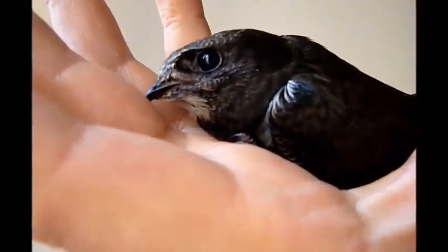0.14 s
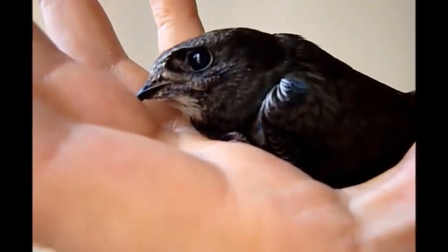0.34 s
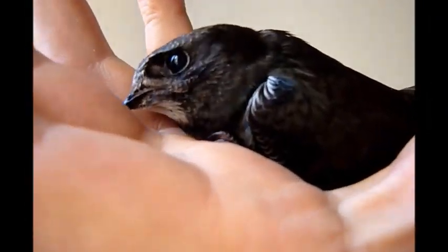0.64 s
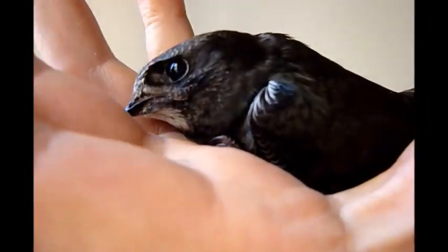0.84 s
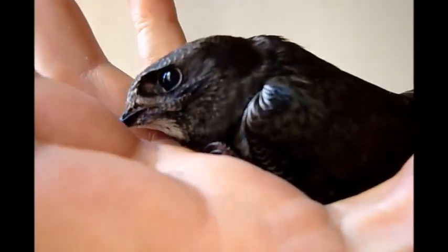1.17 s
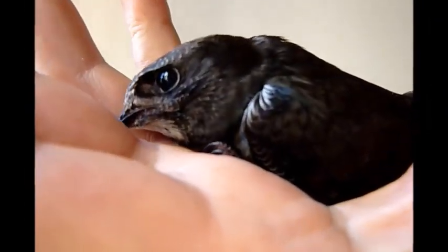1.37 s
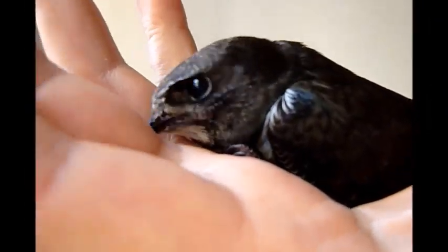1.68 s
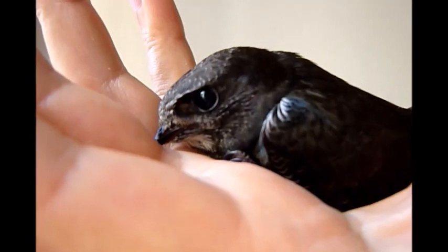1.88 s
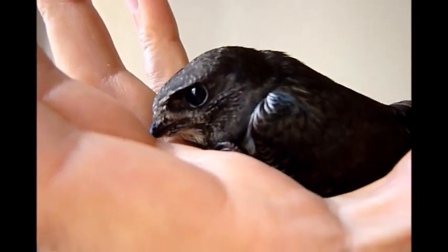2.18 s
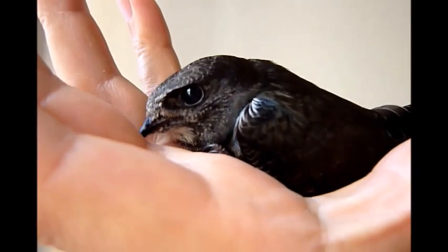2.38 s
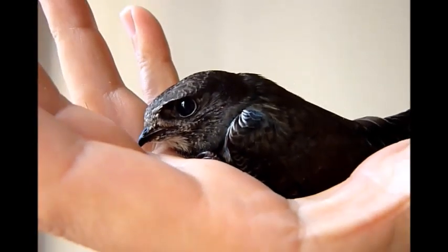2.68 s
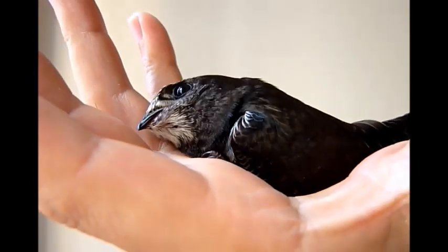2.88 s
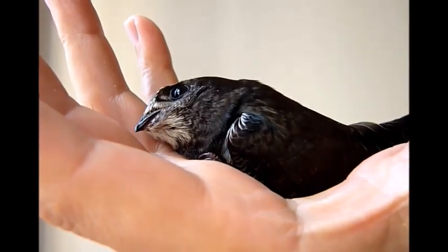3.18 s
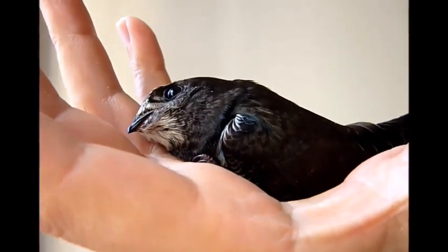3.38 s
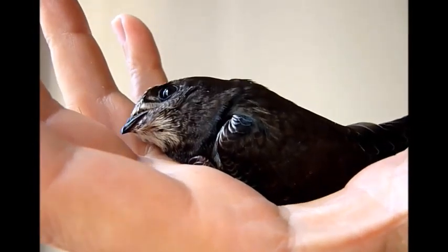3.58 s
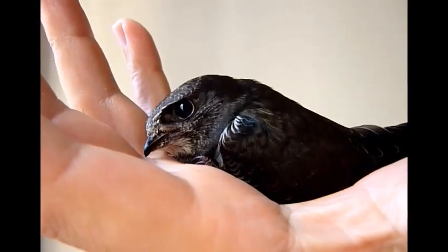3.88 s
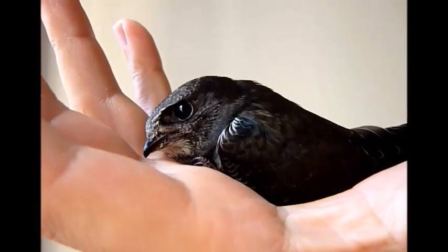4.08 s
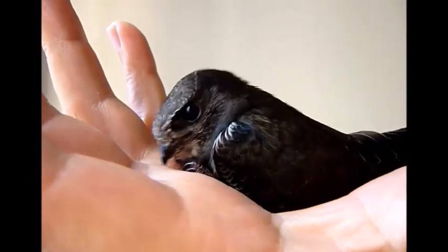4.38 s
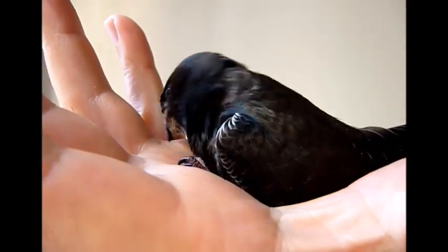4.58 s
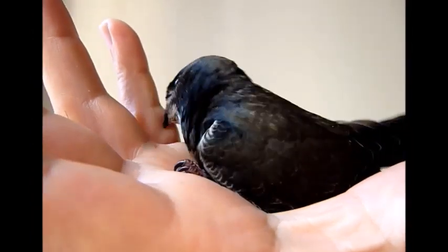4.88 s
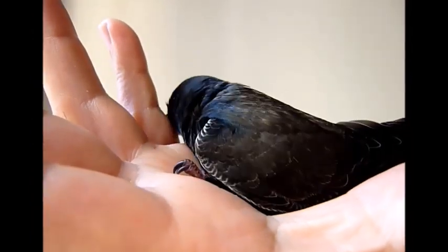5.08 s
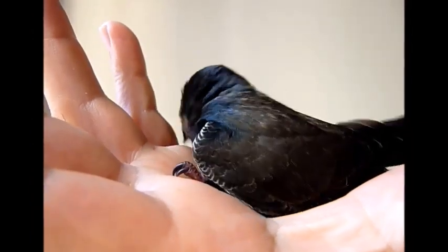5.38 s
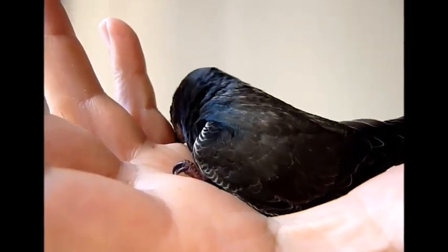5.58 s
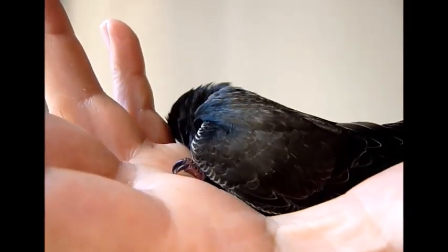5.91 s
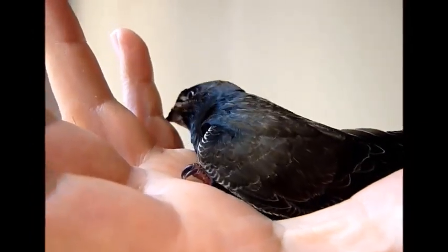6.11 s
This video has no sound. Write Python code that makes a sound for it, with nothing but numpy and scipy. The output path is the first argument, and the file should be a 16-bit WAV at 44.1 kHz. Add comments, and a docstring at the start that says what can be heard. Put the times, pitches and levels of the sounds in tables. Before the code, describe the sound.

Close to the microphone in a small room, a young bird begs in rapid runs of thin, almost pure whistled chirps, about twenty a second, slurred into a quivering trill. Each run tends to climb in pitch, stops abruptly, and resumes after a brief gap. Tiny beak ticks are barely audible. Near the end the bird turns away and sounds softer and roomier. A faint ventilation hum and dull rush continue underneath.

```python
"""A small room, the microphone close by: a young swift held in a hand begs in runs of thin whistled chirps.
About twenty come a second, each an arch of pitch sung by a gliding sine; close ones are slurred together.
Faint beak ticks are puffs of noise. Near the end the bird turns its head away, so that mostly the room,
a dying tail of reflections, answers. A faint ventilation hum and the rush of air, shaped noise, lie underneath."""
import sys
import numpy as np
from scipy import signal
from scipy.fft import rfft, irfft
from scipy.io import wavfile
from scipy.ndimage import uniform_filter1d

SR = 44100
rng = np.random.default_rng(int(sys.argv[2]) if len(sys.argv) > 2 else 0)


def put_to_file(sound):
    """Save the sound as 16-bit audio at rate SR, in the file named by the first command-line argument."""
    columns = np.atleast_2d(sound).T  # one column per channel
    safe = np.clip(columns, -1, 1)
    whole_steps = np.round(safe * 32767)
    wavfile.write(sys.argv[1], SR, whole_steps.astype(np.int16))


N = 275625  # samples, 6.25 s


def swift(jitter=.003, shimmer_db=1.45, octave_at_corner_db=-36, attack_s=0.0015, octave_corner_hz=3700):
    """An almost pure whistle with a slight tremble; only its low notes carry a weak octave."""
    pitch_hz, loudness = gestures()
    pitch_hz = smooth(pitch_hz, 0.00042) * (1 + jitter * drift(250))
    phase = 2 * np.pi * np.cumsum(pitch_hz) / SR
    loudness = smooth(loudness, attack_s) * from_db(shimmer_db * drift(180))
    # the octave is twice as strong well below the corner and vanishes steeply above it
    octave = from_db(octave_at_corner_db) * 2 / (1 + (pitch_hz / octave_corner_hz) ** 8)
    whistle = np.sin(phase) + octave * np.sin(2 * phase)
    return np.sqrt(2) * loudness * whistle  # a steady sine would have rms equal to loudness


# chirps of the bird, levels before tremble and head turn: (start_s, rise_s to the crest, pitch_hz, level_db)
CHIRP_CRESTS = [(0.001, 0.01, 4610, -34.5), (0.051, 0.0051, 4630, -34), (0.107, 0.0087, 4680, -37),
                (0.301, 0.0019, 4200, -40), (0.372, 0.0024, 3166, -55), (0.385, 0.026, 3640, -40.0),
                (0.431, 0.022, 3430, -40.5), (0.467, 0.017, 3550, -39), (0.506, 0.021, 3990, -39.5),
                (0.546, 0.02, 4610, -38.0), (0.609, 0.01, 4764, -36.5), (0.653, 0.016, 4810, -37.5),
                (0.699, 0.018, 4820, -39), (0.738, 0.021, 5266, -34.5), (0.911, 0.0021, 4590, -36),
                (0.94, 0.019, 4196, -38.0), (0.984, 0.02, 4280, -38.0), (1.024, 0.023, 4730, -37),
                (1.078, 0.018, 4840, -35.5), (1.117, 0.028, 5000, -38), (1.166, 0.018, 4620, -39.5),
                (1.203, 0.018, 4800, -37), (1.239, 0.018, 5085, -39.5), (1.276, 0.018, 4940, -35),
                (1.315, 0.02, 5080, -36.5), (1.359, 0.022, 5635, -30.5), (1.571, 0.0021, 3610, -61),
                (1.587, 0.024, 4280, -38), (1.633, 0.017, 3813, -40), (1.667, 0.022, 4500, -38),
                (1.709, 0.025, 4730, -35.5), (1.753, 0.025, 4990, -35.5), (1.8, 0.017, 4770, -38.5),
                (1.826, 0.02, 5230, -37.5), (1.867, 0.018, 5430, -31), (1.909, 0.024, 5930, -30),
                (2.076, 0.002, 4390, -55), (2.153, 0.02, 4340, -39), (2.199, 0.023, 4020, -39.5),
                (2.247, 0.021, 4480, -38), (2.302, 0.011, 4600, -38.5), (2.349, 0.0094, 4985, -33),
                (2.391, 0.015, 5130, -35.0), (2.443, 0.013, 5490, -33.5), (2.494, 0.01, 5490, -34.5),
                (2.711, 0.0017, 3935, -41), (2.74, 0.022, 4284, -38.5), (2.788, 0.02, 4250, -39.5),
                (2.838, 0.017, 4870, -36.5), (2.884, 0.013, 4390, -41), (2.916, 0.021, 4420, -39),
                (2.972, 0.013, 4830, -36.0), (3.022, 0.0071, 5003, -32.5), (3.264, 0.002, 4520, -37.5),
                (3.324, 0.0016, 3760, -41), (3.365, 0.0098, 3820, -41), (3.402, 0.021, 3840, -40.5),
                (3.446, 0.021, 4130, -38.0), (3.509, 0.0015, 3930, -40), (3.547, 0.005, 4060, -38.5),
                (3.594, 0.0055, 4130, -38), (3.631, 0.011, 4060, -40), (3.691, 0.0062, 4420, -39),
                (3.742, 0.0055, 4250, -38.0), (3.903, 0.0013, 4320, -42), (3.923, 0.023, 3700, -45.5),
                (3.96, 0.026, 4080, -39), (4.006, 0.026, 4355, -39.0), (4.061, 0.013, 4400, -40),
                (4.095, 0.02, 4585, -38.5), (4.14, 0.019, 4750, -36.5), (4.195, 0.014, 4790, -37.5),
                (4.238, 0.013, 4590, -40), (4.288, 0.0067, 4650, -39.5), (4.333, 0.0088, 4830, -37.0),
                (4.387, 0.0089, 5026, -34.5), (4.537, 0.0018, 4160, -39), (4.553, 0.021, 3984, -34.0),
                (4.588, 0.0096, 3754, -36.5), (4.615, 0.016, 4170, -35.5), (4.653, 0.014, 4630, -38),
                (4.687, 0.015, 4700, -37.5), (4.718, 0.02, 4360, -39), (4.761, 0.017, 4776, -36.5),
                (4.801, 0.021, 4560, -37.5), (4.839, 0.012, 4736, -36.0), (4.883, 0.017, 5080, -35.0),
                (4.912, 0.007, 4345, -39.5), (4.962, 0.007, 5200, -36.0), (5.137, 0.002, 4460, -43),
                (5.157, 0.018, 4745, -36.5), (5.198, 0.018, 4880, -31.5), (5.247, 0.015, 4974, -32),
                (5.293, 0.016, 5000, -36.0), (5.334, 0.011, 5250, -31.5), (5.378, 0.014, 5220, -35.5),
                (5.422, 0.0066, 5550, -33), (5.604, 0.0034, 4280, -38), (5.632, 0.017, 4350, -35),
                (5.668, 0.019, 4067, -34.5), (5.705, 0.023, 4596, -33.5), (5.749, 0.019, 5010, -33),
                (5.788, 0.016, 4930, -34.0), (5.835, 0.013, 5100, -32.5), (5.877, 0.015, 5200, -30.5),
                (5.927, 0.012, 5670, -35.0), (6.113, 0.0021, 4320, -38.5), (6.136, 0.018, 4610, -36.5),
                (6.174, 0.019, 5005, -36.5), (6.216, 0.019, 4780, -40)]
# shape of a crest; a chirp with hardly any rise is already falling as it starts: (rise_s, roundness exponent)
CREST_ROUNDNESS = [(.002, 1.06), (.012, 1.22)]
# moments when a run of chirps, long or short, stops: (end_s)
RUN_STOPS = [.317, 0.785, 1.407, 1.955, 2.09, 2.528, 3.057, 3.76, 4.406, 4.868, 4.937, 4.981, 5.453, 5.959]
# a chirp that starts this soon after the last crest is slurred onto it
SLUR_WITHIN_S = .029
# a fresh chirp sweeps up to its crest and swells on the way
SWEEP_HZ_PER_S, SWELL_DB_PER_S = 33100, 422
# a free ending slides to a share of the crest pitch, at least down to the relaxed pitch, and fades;
# the fall lasts FALL_S unless the run stops before the next chirp
FALL_S, FALL_SHARE, RELAXED_HZ, FALL_DB = .0238, .828, 3970, 20


def gestures(fade_power=3.22, slurred_turn=0.96, free_turn=.79):
    """Pitch and loudness of the syrinx: a chirp grows out of the last one's trough or starts afresh."""
    t, rows = np.arange(N) / SR, np.array(CHIRP_CRESTS)
    pitch_hz, loudness = np.zeros(N), np.zeros(N)
    next_start = np.append(rows[1:, 0], np.inf)
    slurs_on = next_start - rows[:, 0] - rows[:, 1] < SLUR_WITHIN_S
    for k, (start, rise, crest_hz, crest_db) in enumerate(CHIRP_CRESTS):
        crest = start + rise
        roundness = np.interp(rise, *np.transpose(CREST_ROUNDNESS))
        if k and slurs_on[k - 1]:
            head = *trough(k - 1), slurred_turn
        else:
            head = start, crest_hz - SWEEP_HZ_PER_S * rise, crest_db - SWELL_DB_PER_S * rise, free_turn
        if slurs_on[k]:
            tail = *trough(k), slurred_turn
        else:
            end = next((s for s in RUN_STOPS if crest < s < next_start[k]), crest + FALL_S)
            tail = end, min(FALL_SHARE * crest_hz, RELAXED_HZ), crest_db - FALL_DB, free_turn
        for foot, foot_hz, foot_db, turn in (head, tail):
            span = slice(*np.searchsorted(t, sorted([crest, foot])))
            u = (t[span] - crest) / (foot - crest)  # 0 at the crest, 1 at the foot
            pitch_hz[span] = crest_hz + (foot_hz - crest_hz) * arch(u, turn, roundness)
            loudness[span] = from_db(crest_db + (foot_db - crest_db) * np.abs(u) ** fade_power)
    voiced = pitch_hz > 0
    return np.interp(t, t[voiced], pitch_hz[voiced]), loudness  # pitch glides across the silences


# at times the warble swings wider: (time_s, extra_depth_hz of the troughs)
WARBLE_DEPTH = [(.8, 0), (.94, 302), (1.02, 0), (1.86, 0), (1.91, 281), (2.22, 130), (2.7, -1), (4.9, -1.5),
                (5.2, 476), (5.42, 344), (5.62, -1), (5.71, 75.5), (5.79, 703), (5.9, 498), (6.1, 102.5)]
# slurred crests further apart than SAG_AFTER_S have a lower trough, the lower the longer the wait
SAG_AFTER_S, SAG_HZ_PER_S = .0325, 53500
# the voice thins by THIN_DB in a trough THIN_AT_HZ deep, and hardly at all in a shallow one
THIN_DB, THIN_AT_HZ, THIN_POWER = 12, 835, 1.54


def trough(k):
    """The low point between chirp k and the one slurred onto it, quieter the deeper: (s, Hz, dB)."""
    (start, rise, hz, db), (next_start, next_rise, next_hz, next_db) = CHIRP_CRESTS[k:k + 2]
    wait = next_start + next_rise - start - rise
    sag_hz = SAG_HZ_PER_S * max(wait - SAG_AFTER_S, 0)
    sag_hz += np.interp(next_start, *np.transpose(WARBLE_DEPTH))
    thinning_db = THIN_DB * (max(sag_hz, 0) / THIN_AT_HZ) ** THIN_POWER
    return next_start, min(hz, next_hz) - sag_hz, (db + next_db) / 2 - thinning_db


def arch(u, turn, roundness):
    """Share of the drop from crest (u = 0) to foot (u = 1); a turn near 1 levels out into a trough."""
    return (1 - np.cos(np.pi * turn * np.abs(u) ** roundness)) / (1 - np.cos(np.pi * turn))


# faint ticks of the beak, before the head turn: (start_s, level_db of the rough peak, twice the rms)
BEAK_TICKS = [(.326, -60.5), (.558, -55), (.571, -53), (.613, -54.5), (.6725, -55), (1.037, -53.5),
              (1.229, -49), (1.686, -51), (3.665, -55), (4.03, -55), (4.158, -48.5), (4.891, -44.5),
              (4.958, -55)]
TICK_HZ, TICK_WIDTH_HZ, TICK_T60_S = 5500, 2800, 0.038


def beak():
    """Each tick is a puff of bright noise that dies away by 60 dB in some hundredths of a second."""
    t = np.arange(N) / SR
    level = np.zeros(N)
    for start, peak_db in BEAK_TICKS:
        after = t >= start
        level[after] += from_db(peak_db - 60 * (t[after] - start) / TICK_T60_S)
    return level * resonance(TICK_HZ, TICK_WIDTH_HZ) / 2  # halved: from peak to rms


# close echoes off the palm and fingers: (delay_s, gain)
PALM_ECHOES = [(.0007, 0.063), (.0023, 0.022)]


def hand(x):
    """Close echoes ripple the level as the pitch sweeps."""
    t = np.arange(N) / SR
    return x + sum(gain * np.interp(t - delay, t, x, left=0) for delay, gain in PALM_ECHOES)


# the head shadows the direct path when the beak points away: (time_s, level_db of the direct sound)
HEAD_TURN = [(0, 0), (5.0, 0), (5.141, -15.5), (5.45, -12), (5.58, -4.5), (5.72, -6), (5.77, -15),
             (5.97, -11), (6.1, -5), (6.25, 1.5)]


def facing(x):
    """The direct sound weakens as the beak turns away from the microphone."""
    return x * from_db(np.interp(np.arange(N) / SR, *np.transpose(HEAD_TURN)))


ROOM_T60_S, ROOM_DB, ROOM_DELAY_S = 0.44, -15.5, 0.006


def room(x):
    """Dense wall reflections that die away evenly."""
    t = np.arange(SR) / SR
    response = rng.standard_normal(SR) * from_db(-60 * t / ROOM_T60_S) * (t > ROOM_DELAY_S)
    response /= np.sqrt(np.sum(response ** 2))
    return from_db(ROOM_DB) * signal.fftconvolve(x, response)[:N]


# steady peaks of the ventilation hum: (pitch_hz, width_hz to each side, level_db)
HUM_PEAKS = [(217.4, 50, -67), (257.4, 28, -70.5), (458.4, 5.8, -65.5), (473.8, 9, -69), (533.7, 5, -68.5)]
# the highest hum, which swells and fades: (time_s, relative level_db)
DRONE_SWELL = [(0.0, -62), (0.4, -58.5), (1.0, -65), (1.1, -60.5), (1.6, -64), (2.35, -59.5), (2.7, -64.5),
               (2.9, -56), (3.05, -63), (3.75, -62.5), (4.3, -71), (4.45, -58), (4.55, -66.5), (4.9, -67),
               (5.05, -56.5), (5.6, -66), (6.05, -57.5), (6.25, -63)]
# DRONE_GAIN_DB is the overall loudness of the highest hum
DRONE_HZ, DRONE_WIDTH_HZ, DRONE_GAIN_DB = 892, 62, -1.9


def hum():
    """Narrow resonances stirred by moving air; the highest one comes and goes."""
    steady = sum(from_db(level_db) * resonance(hz, width) for hz, width, level_db in HUM_PEAKS)
    drone_db = np.interp(np.arange(N) / SR, *np.transpose(DRONE_SWELL)) + DRONE_GAIN_DB
    return steady + from_db(drone_db) * resonance(DRONE_HZ, DRONE_WIDTH_HZ)


# spectrum of the room air and microphone hiss: (frequency_hz, relative level_db per Hz)
AIR_SPECTRUM = [(25, -10), (55, -2), (140, 2), (200, 5.5), (280, 4.5), (400, 0), (700, -2), (1100, -7),
                (1700, -8), (2300, -14), (4000, -16.5), (6500, -19), (7500, -24)]
AIR_DB = -54.5  # rms of the whole rush


def air():
    """A steady dull rush with hiss on top, noise shaped along a log frequency axis."""
    points_hz, points_db = np.transpose(AIR_SPECTRUM)
    log_points = np.log(points_hz)
    return from_db(AIR_DB) * shaped_noise(lambda hz: from_db(np.interp(np.log(hz), log_points, points_db)))


def resonance(centre_hz, width_hz):
    """Noise of rms 1 in one peak, 12 dB down at width_hz to each side."""
    return shaped_noise(lambda hz: 1 / (1 + ((hz - centre_hz) / width_hz) ** 2) ** 2)


def drift(rate_hz):
    """Random wander of rms 1, weakening above about rate_hz."""
    return shaped_noise(lambda hz: 1 / (1 + (hz / rate_hz) ** 2) ** 2)


def shaped_noise(gain_at):
    """Noise of rms 1 whose spectrum follows a function of frequency."""
    hz = np.maximum(np.arange(N // 2 + 1) * SR / N, 1)
    return rms_one(irfft(rfft(rng.standard_normal(N)) * gain_at(hz), N))


def rms_one(x):
    """Scale to rms 1."""
    return x / np.sqrt(np.mean(x ** 2) + 1e-20)


def smooth(x, seconds):
    """Round off corners with a triangular window, two running means in a row."""
    size = max(int(seconds * SR), 1)
    return uniform_filter1d(uniform_filter1d(x, size), size)


def from_db(db):
    """Decibels to gain."""
    return 10 ** (np.asarray(db) / 20)


def scene():
    """The bird close by, its room sound, and the background."""
    voice = swift() + beak()
    direct = facing(hand(voice))
    return (direct + room(voice) + hum() + air())[None]


CUTOFF_HZ = 7800
OFFSET = -.035  # of full scale


def record(dry):
    """A narrow-band recorder cuts the top steeply; its converter rests a little below zero."""
    # order 10, 0.1 dB ripple below the cutoff, 70 dB down above it
    low_pass = signal.ellip(10, .1, 70, CUTOFF_HZ, fs=SR, output="sos")
    return signal.sosfilt(low_pass, dry) + OFFSET


dry = scene()
out = record(dry)
put_to_file(out)
```